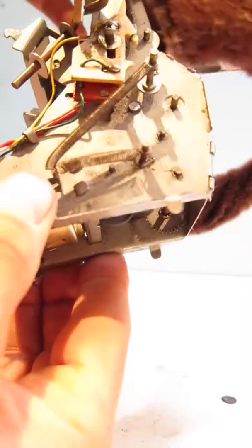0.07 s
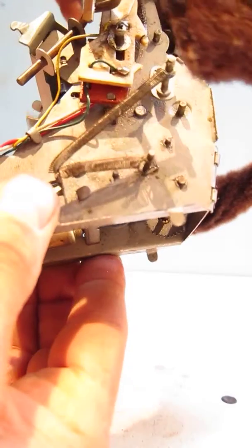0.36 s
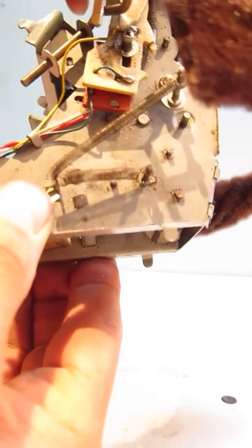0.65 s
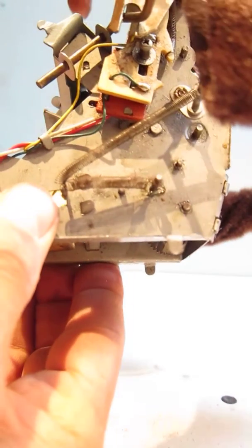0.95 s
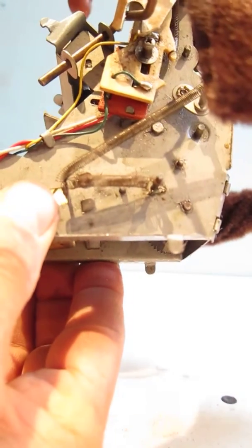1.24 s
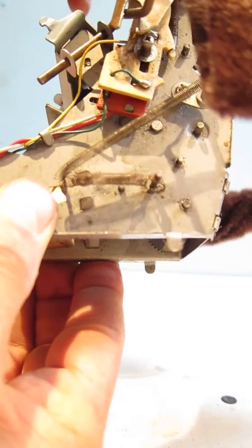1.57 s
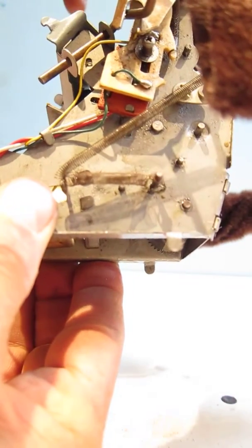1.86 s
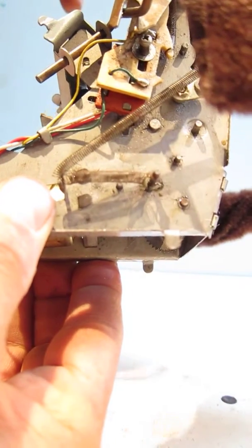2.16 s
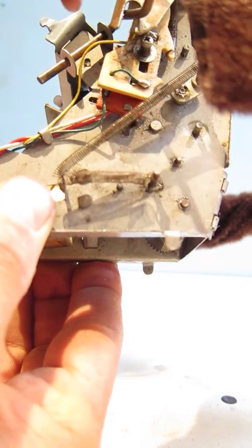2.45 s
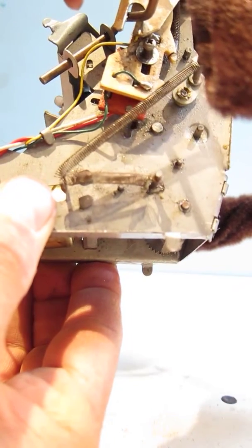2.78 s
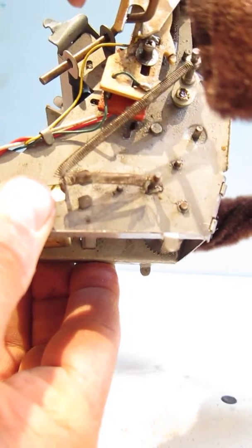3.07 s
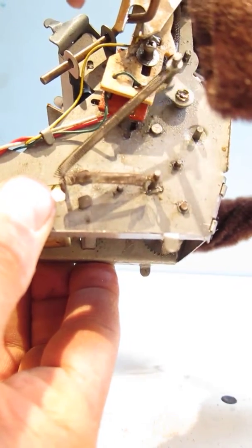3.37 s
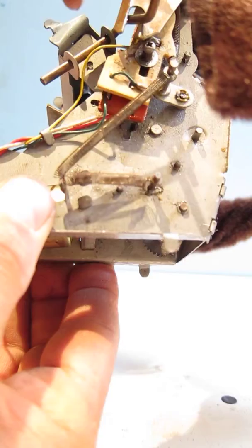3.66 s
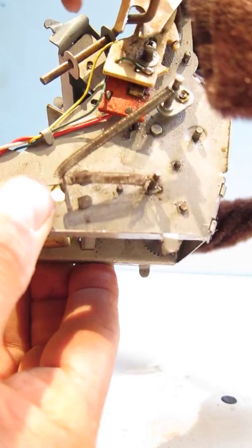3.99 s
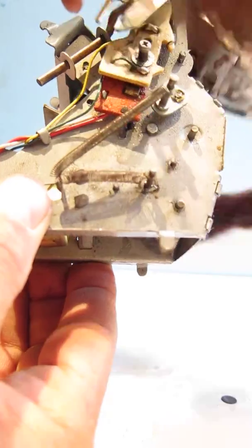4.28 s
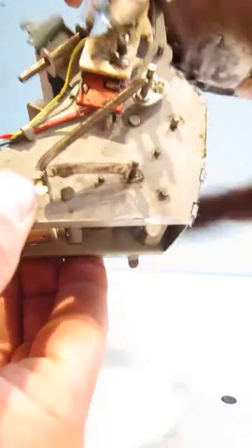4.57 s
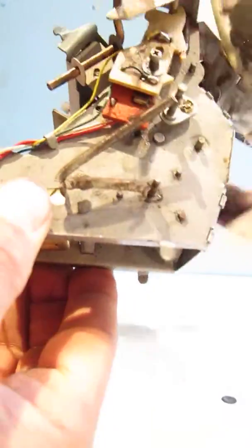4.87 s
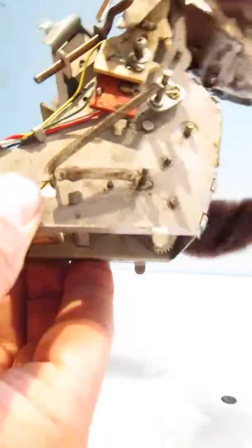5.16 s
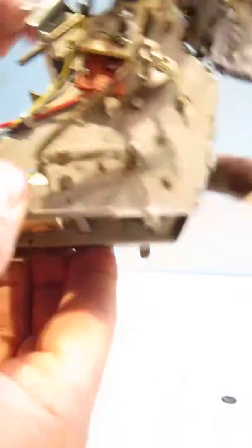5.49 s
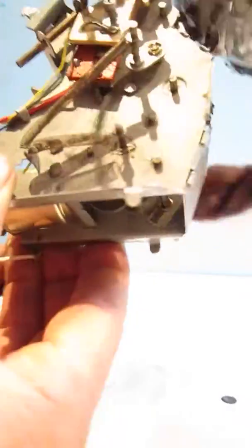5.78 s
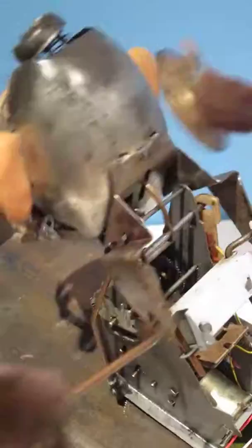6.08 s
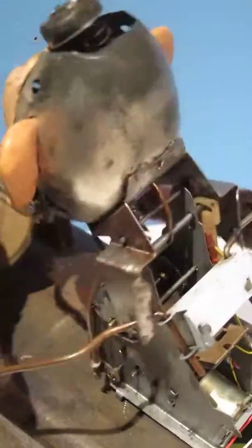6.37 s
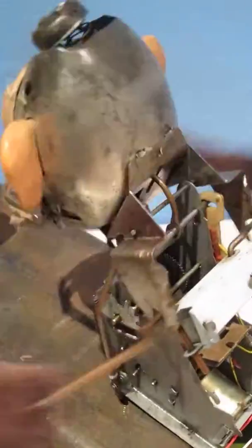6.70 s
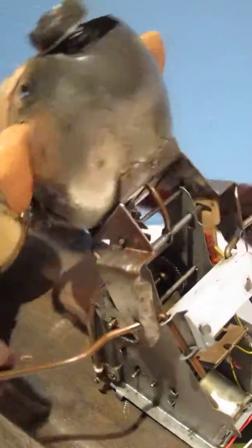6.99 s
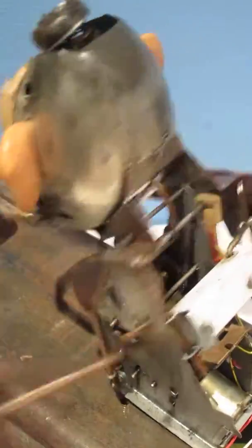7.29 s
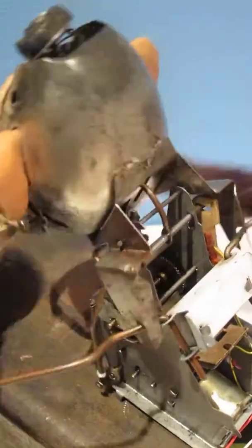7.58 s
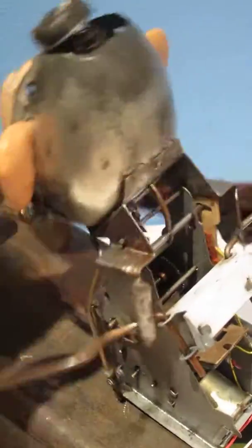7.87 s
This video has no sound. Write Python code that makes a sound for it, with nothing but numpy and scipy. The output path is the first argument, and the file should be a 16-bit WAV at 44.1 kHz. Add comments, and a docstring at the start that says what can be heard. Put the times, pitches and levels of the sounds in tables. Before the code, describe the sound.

Close by in a small, quiet room, a battery toy dog's motor hums faintly under a steady, bright rattle of loose tin gears, with irregular knocks and brief squeaks. About halfway the gearbox clicks over, and a springy lever winds up and snaps back about twice a second with a short metallic ring. Near the end the toy sounds farther off, its gears clattering in bursts between the snaps.

```python
"""A battery toy dog with its fur taken off runs in a small room: a motor drives loose tin gears.
First it walks close by, with a steady hum, rattling teeth, a bent wheel that catches twice a turn
and a squeaking crank. Near 4 s the gearbox changes over, and a cam (an off-centre wheel) winds up
a springy lever that snaps back about twice a second. From about 6 s the toy is heard from farther
off, on its head side: the gears blur into bursts of clatter while the lever keeps snapping."""
import sys
import numpy as np
from scipy import signal
from scipy.fft import rfft, irfft, next_fast_len
from scipy.io import wavfile
from scipy.ndimage import uniform_filter1d

SR = 44100
rng = np.random.default_rng(int(sys.argv[2]) if len(sys.argv) > 2 else 0)


def to_wav(sig):
    """Store sig (one row per channel, or 1-D mono) as 16-bit WAV at the path in sys.argv[1].

    Samples outside -1..1 are clipped; the rate is SR.
    """
    pcm = np.clip(np.atleast_2d(sig), -1, 1) * 32767
    pcm = np.round(pcm).astype(np.int16)
    wavfile.write(sys.argv[1], SR, pcm.T)  # frames by channels


N = 350154
TIME, FFT_SIZE = np.arange(N) / SR, next_fast_len(N, True)
SHIFT_S, FAR_S = 3.92, 6.06  # the gearbox changes over; the listener moves to the head side
PINION_TEETH, WHEEL_TEETH = 8, 27  # the pinion is the small gear on the motor shaft

# walking, then going slack at the change-over: (time [s], rattle level [dB], hum level [dB])
WALK_LEVELS = [(0, -34.5, -69.5), (.72, -32.5, -67.5), (1.1, -29, -62.5), (1.6, -30.5, -60.5),
               (1.85, -28, -59), (2.3, -27.5, -63.5), (2.48, -30.5, -62), (3.4, -28, -61.5),
               (3.88, -28.5, -60.5), (3.97, -45.5, -85), (4.03, -47.5, -93), (4.15, -34.5, -99)]
# the lever lands and bounces: (time [s], level [dB], bounce delay [s], bounce level [dB])
LEVER_SNAPS = [(4.6266, -9, .0101, -10), (5.1063, -12.5, .0122, -9), (5.5986, -11, 0.015, -9),
               (6.2631, -11.5, 0.013, -15.5), (6.826, -10.5, .0098, -14), (7.3731, -10.5, 0.011, -17.5),
               (7.9179, -10, 0.015, -13)]
# how alike left and right sound, close up and from afar: (frequency [Hz], likeness [0-1])
NEAR_LIKENESS = [(100, 1), (800, 0.93), (1500, 1), (2300, 1), (2900, 0.96), (4500, 0.33), (7000, 0.48),
                 (10000, 0.72), (15000, 0.2)]
FAR_LIKENESS = [(100, 0.94), (800, 0.94), (1700, 1), (2300, 0.84), (4000, 0.69), (6000, 0.52),
                (10000, 0.38), (14000, 0)]
# the gearbox lies nearer to one side or the other: (frequency [Hz], left side's lead [radians])
NEAR_LEAD = [(2400, 0), (2900, .3), (3400, 1), (4200, .2), (5250, .8), (6800, -.7), (9200, -.9), (10800, 0),
             (12000, 1), (13000, 1.8), (15000, .4)]
# which side is louder from afar: (frequency [Hz], left minus right [dB])
FAR_BALANCE = [(1200, 1), (2000, 0.5), (4500, -0.5), (6300, 3), (8000, 3), (10200, -1.5), (13000, -1)]


def amp(db):
    """Turns decibels into a factor to multiply by."""
    return 10 ** (np.asarray(db) / 20)


def unit(x):
    """Scales a signal to an average power of 1."""
    return x / np.sqrt(np.mean(x ** 2) + 1e-20)


def curve(rows):
    """Joins (time [s], value) rows by straight lines."""
    return np.interp(TIME, *np.transpose(rows))


def read(points, hz):
    """Reads between (frequency [Hz], value) points, giving each octave equal room."""
    f, value = np.transpose(points)
    return np.interp(np.log(hz + 1), np.log(f + 1), value)


def add(mix, s, sound):
    """Mixes a sound in, starting at s seconds."""
    part = mix[..., round(s * SR):][..., :sound.shape[-1]]
    part += sound[..., :part.shape[-1]]


def passes(turns):
    """True at each moment when a new turn begins."""
    return np.diff(np.floor(np.maximum.accumulate(turns)), prepend=np.floor(turns[0])) > 0


def wander(rate_hz):
    """A smooth random wobble of typical size 1, changing up to about rate_hz."""
    f = np.fft.rfftfreq(FFT_SIZE, 1 / SR)
    f = f[f < 1500]
    real, imaginary = rng.standard_normal((2, len(f)))
    return unit(irfft((real + 1j * imaginary) * np.exp(-(f / rate_hz) ** 2), FFT_SIZE)[:N])


def stereo_noise(size, likeness=NEAR_LIKENESS):
    """An even hiss whose left and right are more alike at some frequencies than at others."""
    padded = next_fast_len(size, True)
    a, b = rfft(rng.standard_normal((2, padded)))
    same = np.clip(read(likeness, np.fft.rfftfreq(padded, 1 / SR)), 0, 1)
    mid, side = a * np.sqrt((1 + same) / 2), b * np.sqrt((1 - same) / 2)
    return irfft(np.array([mid + side, mid - side]), padded)[:, :size]


def colour(x, points, balance, resonances=(), size=4096):
    """Gives a sound its tone colour, its left-right balance and its ringing pitches."""
    hz = abs(np.fft.fftfreq(size, 1 / SR))
    peaks = sum(abs(amp(db) ** 2 - 1) / (1 + (2 * (hz - f) / width) ** 2) for f, width, db in resonances)
    gain = unit(np.sqrt(1 + peaks) * amp(read(points, hz) + np.array([[.5], [-.5]]) * read(balance, hz)))
    taps = np.fft.ifft(np.exp(np.conj(signal.hilbert(np.log(gain))))).real  # rings only after a blow
    return signal.oaconvolve(x, taps[:, :size // 2], axes=1)[:, :N]


def out_of_step(x, lead):
    """Puts the left and right waves out of step, by a different amount at each frequency."""
    phase = read(lead, np.fft.rfftfreq(FFT_SIZE, 1 / SR))
    return irfft(rfft(x, FFT_SIZE) * np.exp(1j * np.array([[.5], [-.5]]) * phase), FFT_SIZE)[:, :N]


def room_air():
    """The faint, steady hiss of a quiet room."""
    # colour of the hiss: (frequency [Hz], relative level [dB])
    air_colour = [(20, -12.5), (100, -2), (300, 2), (1500, 18), (15000, -76)]
    return amp(-61) * colour(stereo_noise(N), air_colour, balance=[(100, 1)])


def room_echo(x):
    """A small, soft room adds a short tail whose highest treble dies first."""
    # how long the echo lasts: (frequency [Hz], t60 or time to fade by 60 dB [s])
    fade_times = [(200, 0.14), (2000, 0.23), (8000, 0.34), (15000, 0.077)]
    hz, t, noise = signal.stft(rng.standard_normal((2, SR // 2)), SR, nperseg=256)
    fade = amp(-60 * t / read(fade_times, hz)[:, None]) * (t > .004)
    tail = signal.istft(noise * fade, SR, nperseg=256)[1]
    return signal.fftconvolve(x, tail / np.linalg.norm(tail[0]), axes=1)[:, :N]


def far_hum(cam, free_hz=335, sag_hz=85, level_db=-74):
    """From afar the motor murmurs, sagging as it winds the spring and racing after each snap."""
    hz = (free_hz - sag_hz * (cam % 1)) * (1 + 0.093 * wander(26.6))
    level = amp(level_db + 6.5 * wander(16.9))
    return level * np.sin(2 * np.pi * np.cumsum(hz) / SR) * (TIME > FAR_S)


def near_hum(turns, rotor_db=-2.3, poles_db=-1):
    """The motor's unbalanced rotor hums; its three magnet poles add a rough tone three times as high."""
    rough = .7 + .7 * (wander(40) + 1j * wander(40))
    poles = (rough * np.exp(2j * np.pi * 3 * turns)).real
    level = amp(curve([(s, db) for s, _, db in WALK_LEVELS]))
    return level * (amp(rotor_db) * np.sin(2 * np.pi * turns) + amp(poles_db) * poles)


def pinion_whine(turns, strain, load_db):
    """The straining pinion whines faintly as its teeth meet, falling in pitch as the motor slows."""
    level = amp(load_db - 27) * strain * (1 + .5 * wander(90))
    return level * np.sin(2 * np.pi * PINION_TEETH * turns)


def crank_squeaks(waver=0.013):
    """The dry crank pin sticks and slips: a scraping, gliding squeak that comes in spurts."""
    # squeaks: (time [s], length [s], first pitch [Hz], last pitch [Hz], relative level [dB])
    squeaks = [(0.087, 0.19, 3310, 3670, -36.5), (0.777, .16, 3200, 3450, -31),
               (1.521, 0.16, 3080, 3680, -30), (2.046, 0.16, 2960, 3760, -28.5),
               (2.69, 0.18, 3220, 3700, -30.5), (3.484, 0.17, 3190, 3810, -28),
               (3.988, 0.23, 3640, 3500, -37.5), (4.023, 0.11, 3170, 2870, -36),
               (5.68, 0.116, 3600, 3400, -39)]
    tones, drift = np.zeros(N, complex), 1 + waver * wander(64)
    for s, length, first_hz, last_hz, db in squeaks:
        glide = np.linspace(first_hz, last_hz, round(length * SR))
        hz = glide * drift[round(s * SR):][:len(glide)]
        swell = amp(db + 2) * signal.windows.tukey(len(hz), .4)
        add(tones, s, swell * np.exp(2j * np.pi * np.cumsum(hz) / SR))
    grip = .6 + .55 * (wander(340) + 1j * wander(340))
    spurts = amp(2.2 * wander(50) - 1.6)
    return out_of_step((tones * grip * spurts).real, NEAR_LEAD)


def landings(rows, first_t60, bounce_t60):
    """Splits each snap into two blows: (time [s], level [dB], fade time [s])."""
    return [blow for s, db, delay, bounce_db in rows
            for blow in ((s, db, first_t60), (s + delay, bounce_db, bounce_t60))]


def snaps(blows, points, modes, balance, likeness, ring_db):
    """Metal chatters against its stop, then the loose parts ring on with a buzz."""
    chatter, rings, t = np.zeros((2, N)), np.zeros((2, N)), np.arange(SR // 2) / SR
    for s, db, t60 in blows:
        add(chatter, s, amp(db - 60 * t / t60) * stereo_noise(len(t), likeness))
        for hz, mode_db, mode_t60 in modes:
            # short waves reach left and right out of step
            phase = 2 * np.pi * rng.random() + rng.standard_normal((2, 1)) * hz / 9000
            hz = hz * (1 + .002 * rng.standard_normal())
            fade = amp(db + ring_db + mode_db - 60 * t / mode_t60)
            add(rings, s, fade * np.sin(2 * np.pi * hz * t + phase))
    buzz = .85 + .45 * wander(260)
    return colour(chatter, points, balance) + rings * buzz


def far_snaps():
    """The lever snaps back, heard from the head side."""
    # colour of a snap there: (frequency [Hz], relative level [dB])
    head_colour = [(60, -38), (300, -29), (750, -26), (1080, -6), (1500, -11), (1900, 1), (2500, 3),
                   (3500, -9.5), (4500, 1), (5200, -1.5), (6300, 3), (7600, -12.5), (10200, -6.5),
                   (12600, 0), (15500, -15)]
    # tones that ring on: (pitch [Hz], relative level [dB], fade time [s])
    head_tones = [(1042, -18, 0.32), (1815.5, 1, 0.057), (2370, -5, 0.12), (4420, -1, 0.18),
                  (4680, -6, 0.18), (4900, -12, .15), (6160, -8, 0.082), (6600, 3.5, 0.06),
                  (10098, -1, 0.18), (10100, 1, 0.3), (11000, -15, 0.17), (12200, -11, 0.18),
                  (12710, -8, 0.19)]
    blows = landings([row for row in LEVER_SNAPS if row[0] > FAR_S], first_t60=0.071, bounce_t60=0.12)
    return snaps(blows, head_colour, head_tones, FAR_BALANCE, FAR_LIKENESS, ring_db=-12)


def near_snaps():
    """Close up, the change-over latch drops in; then the lever starts snapping back."""
    # clicks of the latch: (time [s], level [dB])
    latches = [(3.8913, -19), (4.1699, -14)]
    # colour of a snap beside the lever: (frequency [Hz], relative level [dB])
    lever_colour = [(60, -37), (250, -30), (550, -23.5), (1600, -20), (2100, -7.5), (2430, 1), (3100, -14),
                    (3700, -15.5), (5200, -15), (6200, -9), (7500, -27), (10700, -17), (13000, -18),
                    (15500, -25)]
    # tones that ring on: (pitch [Hz], relative level [dB], fade time [s])
    lever_tones = [(2286, -6.5, 0.22), (2493, -4, 0.094), (2826, -9, 0.27), (4460, -12, 0.17),
                   (5980, -10, 0.15), (6250, -3.5, 0.14), (5980, 0, 0.11), (6560, -7, 0.19),
                   (7650, -19, 0.26), (10070, -5.5, 0.21), (10620, -8.5, 0.48), (11470, -2, 0.12),
                   (12500, -13, 0.24), (13000, -6, 0.22), (13700, -20, 0.22)]
    # the loud close snaps overload the recorder, so left and right sound less alike, even in the bass:
    # (frequency [Hz], likeness [0-1])
    likeness = [(100, 0.4), (1200, 0.56), (2400, 0.7), (4000, 0.07), (15000, 0.8)]
    balance = [(2400, -0.6), (6200, 1), (11000, -0.8)]  # (frequency [Hz], left minus right [dB])
    blows = [(s, db, .029) for s, db in latches]
    blows += landings([row for row in LEVER_SNAPS if row[0] < FAR_S], first_t60=0.069, bounce_t60=0.067)
    return snaps(blows, lever_colour, lever_tones, balance, likeness, ring_db=-9.5)


def tin_frame(blows, likeness, crack_t60, ring_t60, ring_db, spots=40, size=2048):
    """Each blow lands on one of several spots of the tin frame: a crack and a short, dense ring."""
    t, out = np.arange(size) / SR, np.zeros((2, N + size))
    fade = amp(-60 * t / crack_t60) + amp(ring_db - 60 * t / ring_t60)
    rings = [unit(stereo_noise(size, likeness) * fade) / np.sqrt(size) for _ in range(spots)]
    spot = rng.integers(0, spots, N)
    for at in np.flatnonzero(blows):
        out[:, at:at + size] += blows[at] * rings[spot[at]]
    return out[:, :N]


def tooth_ticks(turns, spread_db, wheel_db, wobble_db, uneven_db, tight_at=0.94, lead_turns=0.2):
    """The pinion ticks on a bent wheel that runs tight once a turn and wobbles three times as fast."""
    angle = 2 * np.pi * (turns * PINION_TEETH / WHEEL_TEETH - tight_at + 0.022 * wander(40))
    teeth_meet = passes(PINION_TEETH * turns + .3 * wander(600))
    tightness = np.cos(angle + 2 * np.pi * lead_turns)
    press_db = wheel_db * tightness + wobble_db * np.cos(3 * angle) + uneven_db * wander(37)
    blows = teeth_meet * amp(press_db + spread_db * np.minimum(rng.standard_normal(N), 2))
    return blows / np.sqrt(uniform_filter1d(blows ** 2, size=2600) + 1e-9)  # evens out slow swells


def link_knocks(wheel, load, spread_db=4, jitter_turns=.024, bounce_s=.003, bounce_db=-4):
    """The wheel jolts the loose links as it catches; now and then one lands hard. Each bounces once."""
    # where the bent wheel catches: (place in the turn [0-1], level over the rattle [dB])
    catches = [(.935, 27), (.59, 20.5)]
    # the hardest knocks on the frame: (time [s], level [dB])
    hard_knocks = [(0.102, -10), (0.4671, 1), (0.8718, 1.5), (0.9778, -6), (1.0515, 2), (1.1733, 2.5),
                   (1.5155, 10), (1.6553, 5), (1.7851, 5.5), (1.8058, 2.5), (1.8287, 7.5), (1.8672, 3),
                   (2.081, 7.5), (2.382, 4), (2.5588, 7.5), (2.6509, 9), (2.9686, 4), (3.005, 4),
                   (3.3223, 5.5), (3.389, 5), (3.6538, 5), (3.7517, 6), (3.8272, 2.5), (3.8472, 3),
                   (3.8914, 9), (4.17, -1.5), (4.2979, 4)]
    knocks, bounces = np.zeros(N), np.zeros(N)
    for place, db in catches:
        force = amp(db + spread_db * np.minimum(rng.standard_normal(N), 1.3))
        knocks += load * force * passes(wheel - place + jitter_turns * wander(40))
    for s, db in hard_knocks:
        add(knocks, s, amp([db]))
    delay_s = bounce_s * (.5 + rng.random(N))
    for at in np.flatnonzero(knocks):
        add(bounces, at / SR + delay_s[at], knocks[at] * amp([bounce_db]))
    return knocks + bounces


def far_gears(turns, cam, rise_s=0.0039, knock_hz=1800, knock_db=-13, knock_rise_s=0.0035):
    """From the head side the ticks blur into bursts of clatter, each with a hollow shell knock."""
    # the gears take up their slack: (place in the cam's turn [0-1], relative level [dB])
    clatter = [(.17, -24.5), (.23, -19), (.287, -21), (0.342, -24.5), (.395, -23.5), (0.461, -30),
               (0.536, -29), (.604, -18.5), (.669, -19.5), (0.73, -19), (.813, -23), (0.92, -20.5)]
    # colour of the gear noise from afar: (frequency [Hz], relative level [dB])
    far_colour = [(25, -50), (70, -29), (190, -33), (420, -32.5), (800, -22.5), (1400, -9.5), (1850, -6),
                  (2300, -9), (3300, -7), (5600, -4), (7500, -11.5), (10000, -6.5), (12000, -4.5),
                  (15500, -27)]
    # where the head shell rings: (pitch [Hz], width [Hz], boost [dB])
    shell = [(283, 58, 13.7), (463, 30, 11.5), (1160, 17, 8.7), (1870, 370, 1.4), (2006, 76, 8.2),
             (2430, 80, 3.7), (2840, 190, 7.1), (3710, 150, 4.8), (4650, 67, 1.3)]
    press, knocks, t = amp(-37) * (TIME > FAR_S), np.zeros(N), np.arange(SR // 12) / SR
    burst_shape = t / rise_s * np.exp(1 - t / rise_s)
    knock_shape = t / knock_rise_s * np.exp(1 - t / knock_rise_s)
    for place, usual_db in clatter:
        for s in TIME[passes(cam - place + 0.00502 * wander(5)) & (TIME > FAR_S)]:
            db = usual_db + 0.5 * rng.standard_normal()
            add(press, s, amp(db - 10) * burst_shape)
            detune, phase = rng.random(2)
            tone = np.sin(2 * np.pi * (knock_hz * (1 + 0.12 * (detune - .5)) * t + phase))
            add(knocks, s, amp(db + knock_db) * knock_shape * tone)
    blows = press * tooth_ticks(turns, spread_db=3.5, wheel_db=3, wobble_db=0.5, uneven_db=3)
    rattle = tin_frame(blows, FAR_LIKENESS, crack_t60=0.0069, ring_t60=0.099, ring_db=-18.5, spots=12)
    return knocks + colour(rattle, far_colour, FAR_BALANCE, shell)


def near_gears(turns, load_db, steps_per_wheel_turn=.0645, step_db=0.58, shaft_tick_db=21.5):
    """Close up, teeth tick, loose links knock and sliding metal hisses."""
    # gear noise while walking and after the change-over: (frequency [Hz], relative level [dB])
    walk_colour = [(90, -34.5), (350, -27.5), (550, -21), (1100, -17.5), (1500, -9.5), (2000, -7),
                   (3300, -3.5), (4300, -6.5), (7300, -8.5), (9500, -2), (10600, -0.5), (13500, -8),
                   (15500, -15.5)]
    cam_colour = [(90, -40.5), (350, -29.5), (600, -23.5), (1150, -21), (1600, -14.5), (2300, -7.5),
                  (3300, -10), (3900, -10), (5300, -11), (7000, -14.5), (10500, -7), (13000, -13.5),
                  (15500, -26)]
    # where the gearbox plates ring: (pitch [Hz], width [Hz], boost [dB])
    plates = [(1560, 220, 10.5), (2208, 360, 8.5), (2820, 180, 7.5), (3360, 250, 2), (5340, 410, 7),
              (6927, 410, 9), (8770, 83, 6.5)]
    # which side is louder: (frequency [Hz], left minus right [dB])
    balance = [(2000, -1), (2750, -2), (3500, -1), (4400, 5), (5350, -3), (6900, 9), (8500, -14),
               (9400, 9.5), (10700, -3.5), (11800, -4), (13000, 1.5)]
    wheel, walking = turns * PINION_TEETH / WHEEL_TEETH, TIME < SHIFT_S
    steps = np.cos(2 * np.pi * (steps_per_wheel_turn * wheel + .32))  # each step leans on the gears
    load = amp(load_db + step_db * steps * walking) * (TIME < FAR_S)
    ticks = tooth_ticks(turns, spread_db=6.5, wheel_db=2.2, wobble_db=3.5, uneven_db=3.5)
    blows = amp(0.5) * load * ticks + link_knocks(wheel, load * walking)
    shaft_force = amp(shaft_tick_db + 6.4 * np.minimum(rng.standard_normal(N), 1.5))
    blows += load * ~walking * passes(turns) * shaft_force  # winding adds one hard tick a turn
    rattle = tin_frame(blows, NEAR_LIKENESS, crack_t60=0.0051, ring_t60=0.033, ring_db=-10)
    rattle += amp(-10.5) * load * stereo_noise(N)
    walk_rattle = colour(rattle * walking, walk_colour, balance, plates)
    cam_rattle = colour(rattle * ~walking, cam_colour, balance, plates)
    return out_of_step(walk_rattle + cam_rattle, NEAR_LEAD)


def winding(stall_s=.11, steepness=2.5, stall_db_per_s=213):
    """Spring strain and rattle level [dB]: both grow to a crest, then the motor almost stalls."""
    # the cam winds the spring: (start [s], release [s], first rattle [dB], rattle at the crest [dB])
    winds = [(4.151, 4.629, -31, -24), (4.627, 5.107, -42.5, -30), (5.108, 5.601, -44, -30),
             (5.599, 6.09, -44, -29.5)]
    strain, load_db = np.zeros(N), curve([(s, db) for s, db, _ in WALK_LEVELS])
    for start, release, first_db, crest_db in winds:
        begun, crest = TIME >= start, release - stall_s
        progress = np.clip(TIME - start, 0, release - start) / (crest - start)  # passes 1 at the crest
        strain = np.where(begun, progress ** steepness, strain)
        rising_db = first_db + (crest_db - first_db) * np.minimum(strain, 1)
        stall_db = stall_db_per_s * np.clip(TIME - crest, 0, stall_s)
        load_db = np.where(begun, rising_db - stall_db, load_db)
    return strain * (TIME < FAR_S), load_db


def cam_turns(turn_s=.55):
    """Counts the cam's turns while on the head side: a whole number at every snap."""
    releases = [row[0] for row in LEVER_SNAPS if row[0] > FAR_S]
    releases = [releases[0] - turn_s, *releases, releases[-1] + turn_s]
    return np.interp(TIME, releases, np.arange(len(releases)))


def scene(sag_hz=59.93):
    """One motor shaft drives the gears; close up, it slows as the spring is wound."""
    # the motor shaft while walking: (time [s], speed [turns per s])
    speed = [(0.0, 160.2), (0.15, 165.4), (0.85, 165.8), (1.15, 170.7), (1.45, 167.8), (1.78, 175.4),
             (2.02, 174.5), (2.2, 166.7), (2.38, 169.7), (2.6, 174.0), (3.2, 170.7), (3.9, 175.9)]
    strain, load_db = winding()
    cam = cam_turns()
    turns = np.cumsum(curve(speed) - sag_hz * strain) / SR + .03 * wander(12)
    near = near_gears(turns, load_db) + pinion_whine(turns, strain, load_db)
    near += near_hum(turns) + crank_squeaks() + near_snaps()
    far = far_gears(turns, cam) + far_hum(cam) + far_snaps()
    return room_air() + near + far + amp(-16.5) * room_echo(near) + amp(-12.5) * room_echo(far)


def record(dry, notch_hz=8220, notch_q=9.26, top_hz=15850):
    """The microphone has a deep dip in the treble; peaks are clipped and the highest treble is cut."""
    notch = signal.iirnotch(notch_hz, notch_q, SR)
    notched = signal.lfilter(*notch, signal.lfilter(*notch, dry))
    treble_cut = signal.firwin(511, top_hz, window=("kaiser", 9), fs=SR)
    return signal.oaconvolve(np.clip(notched, -1, 1), treble_cut[None], "same")


dry = scene()
out = record(dry)
to_wav(out)
```